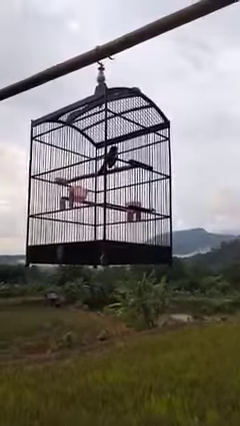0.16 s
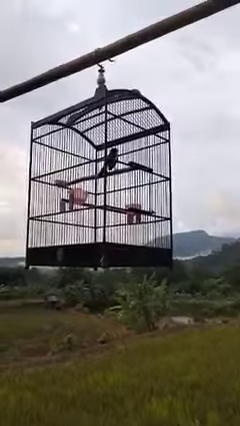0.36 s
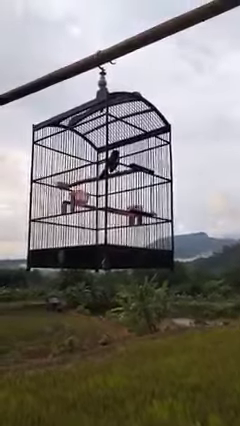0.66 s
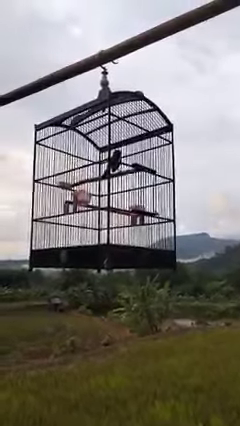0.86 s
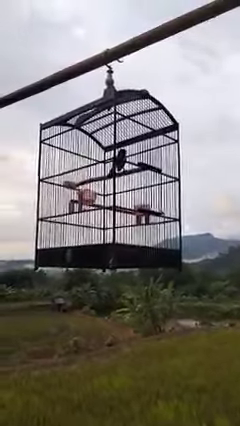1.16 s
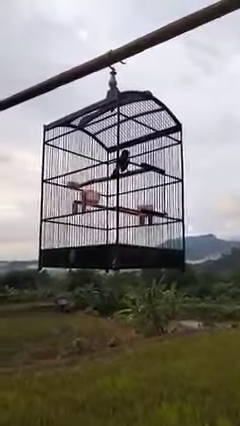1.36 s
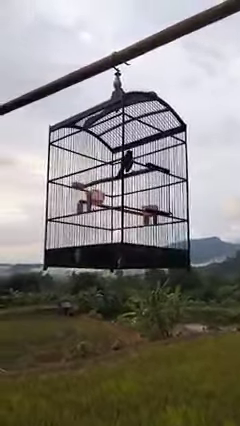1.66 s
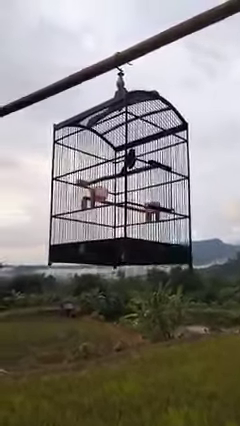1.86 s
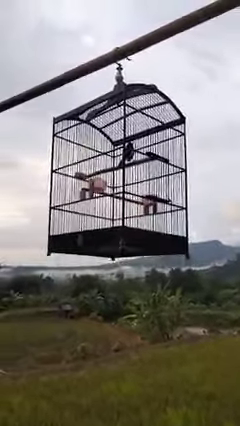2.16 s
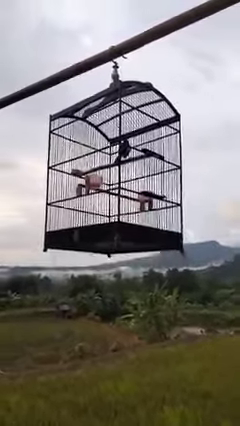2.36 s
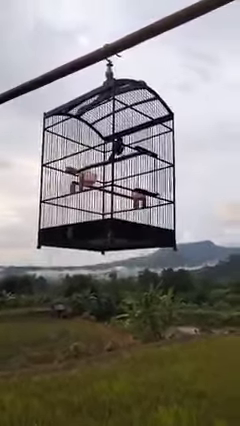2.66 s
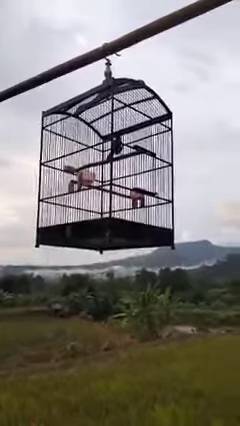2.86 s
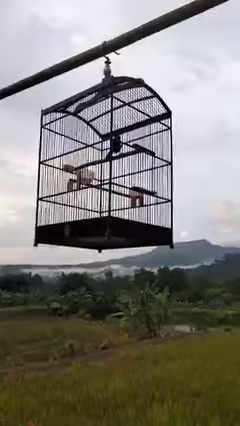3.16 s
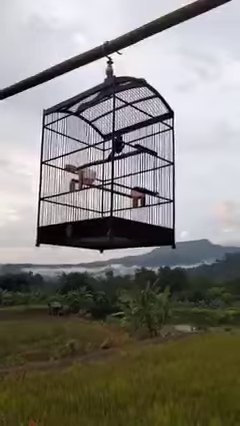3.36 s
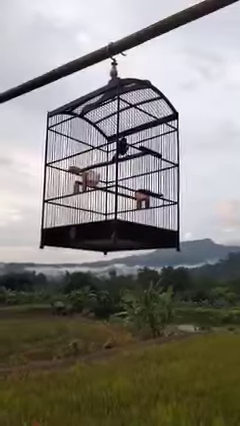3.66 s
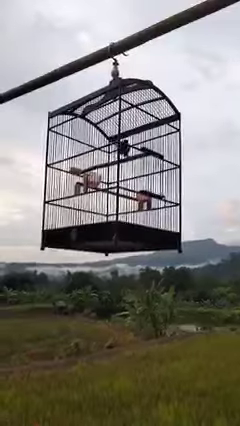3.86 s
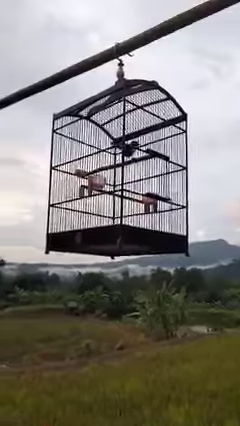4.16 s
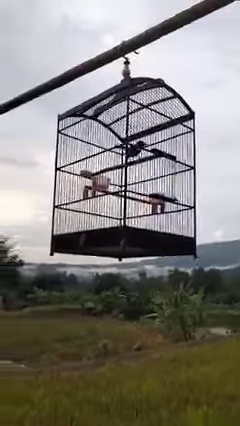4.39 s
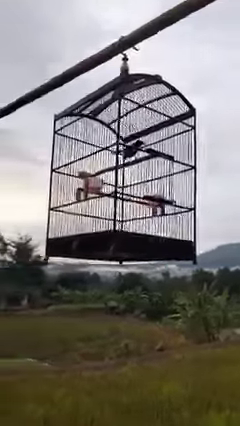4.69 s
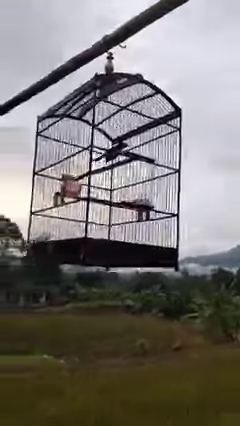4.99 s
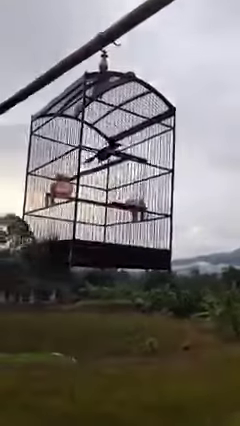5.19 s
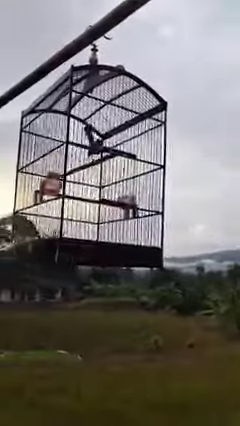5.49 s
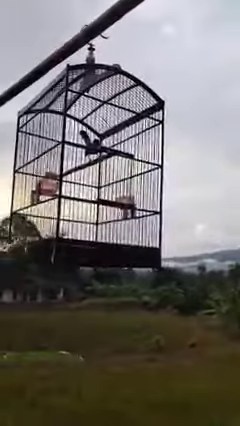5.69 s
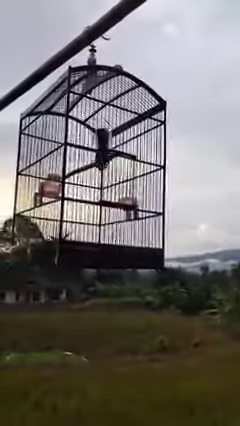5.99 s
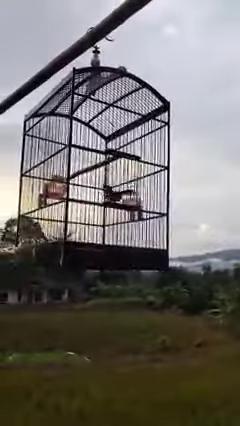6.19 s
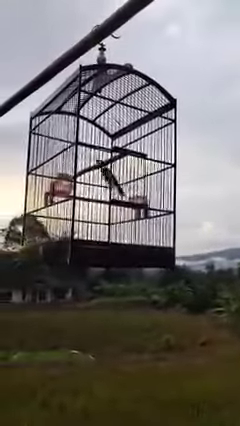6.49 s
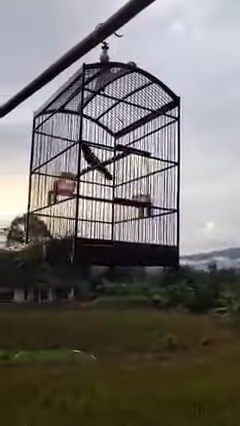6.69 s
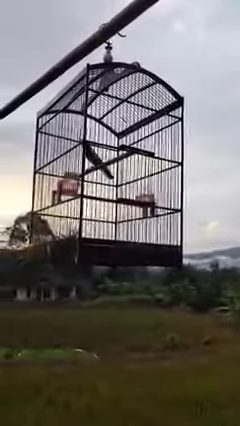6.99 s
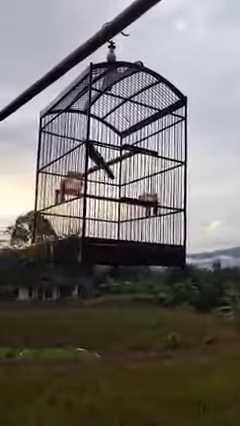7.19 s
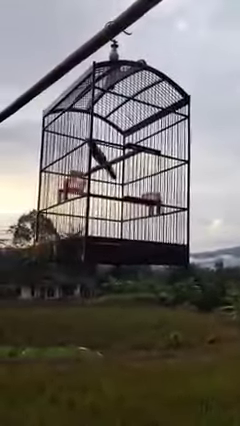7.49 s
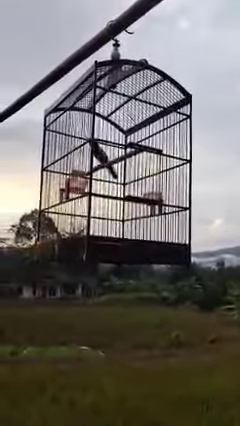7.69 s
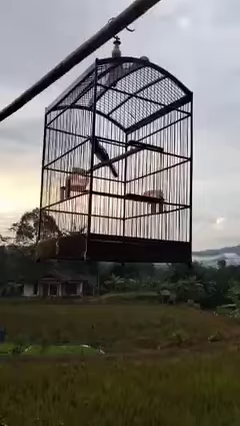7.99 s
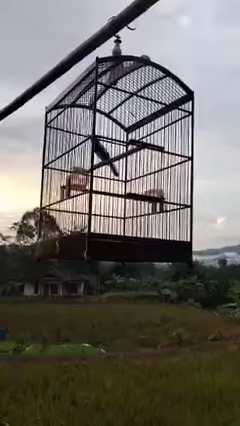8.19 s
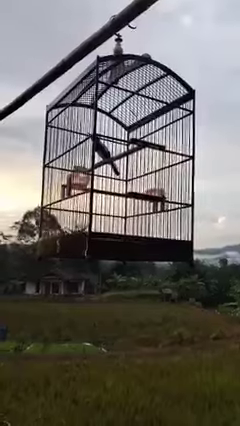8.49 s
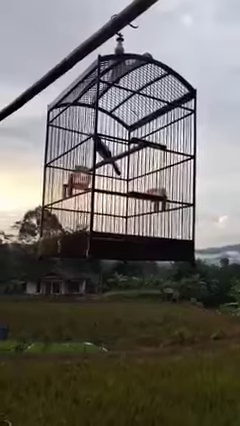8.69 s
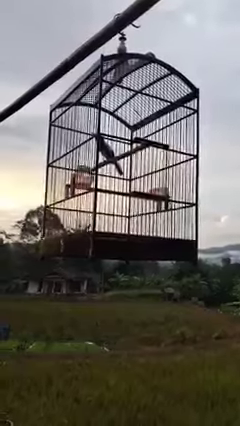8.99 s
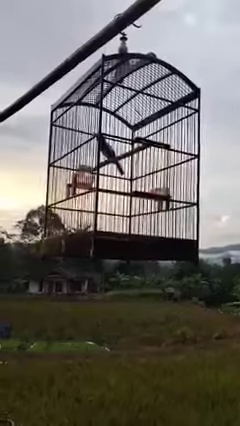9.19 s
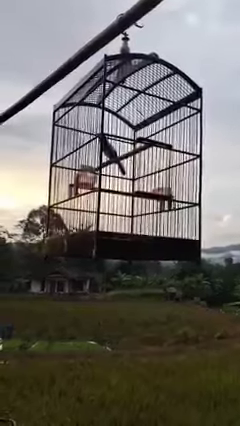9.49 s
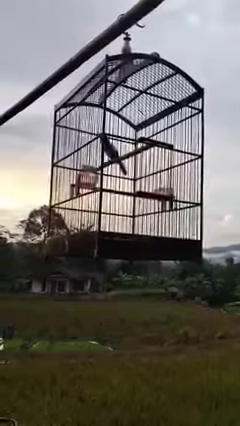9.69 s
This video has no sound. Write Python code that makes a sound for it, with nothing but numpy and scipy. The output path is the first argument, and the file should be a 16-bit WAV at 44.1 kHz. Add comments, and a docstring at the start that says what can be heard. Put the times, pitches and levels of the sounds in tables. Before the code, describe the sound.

Loud, sharp whistled phrases from a nearby caged bird echo lightly over open fields, broken by pauses with faint distant birdsong.

```python
"""Caged magpie-robin above rice fields

A magpie-robin sings three phrases from a hanging cage: gliding sines for the two sides of its syrinx,
pulsed harmonics for buzzes, noise bursts for rasps, and a wall nearby throws the song back.
Feet tap the perches as decaying sines; one dry tick and its rustle are shaped noise.
Birds further off are blurred sine whistles, over humming distant engines and filtered-noise air."""
import sys
import numpy as np
from scipy import signal
from scipy.fft import rfft, irfft
from scipy.io import wavfile
from scipy.ndimage import map_coordinates

SR = 44100
rng = np.random.default_rng(int(sys.argv[2]) if len(sys.argv) > 2 else 0)


def log_audio(samples):
    """Write samples as a 16-bit WAV file to the path given in sys.argv[1]."""
    # one column per channel
    frames = np.atleast_2d(samples).T
    # limit to full scale, then quantise
    limited = np.clip(frames, -1, 1)
    pcm = np.round(limited * 32767).astype(np.int16)
    wavfile.write(sys.argv[1], SR, pcm)


N = 434385
TIME = np.arange(N) / SR

# Low wash of the valley: relative spectrum (frequency [Hz], level [dB])
AIR_SPECTRUM = [(15, -55.5), (25, -21.5), (96, -15), (123, -6), (210, -1.5), (306, -8), (366, -6),
                (400, -10), (533, -12.5), (819, -13), (1800, -16.5), (2340, -70.5), (3960, -120)]
# Its slow level before a small overall trim: (time [s], level [dB])
AIR_LEVEL = [(0.0, -51.5), (2.47, -50.5), (6.01, -55), (7.41, -53), (9.85, -54.5)]
# High outdoor hiss: relative spectrum (frequency [Hz], level [dB])
HISS_SPECTRUM = [(1000, -26), (1700, -7), (2500, 1), (3600, -2), (4600, -10.5), (5500, -5.5), (6500, -11),
                 (7500, -0.5), (8200, -6.5), (9100, -10.5), (9800, -23), (11800, -19.5), (15000, -33)]
# Its level, around which it gently swells: (time [s], level [dB])
HISS_LEVEL = [(0, -59), (8.4, -57.5), (9.2, -57), (9.85, -56.5)]

# Two distant engines: strength of each multiple of the firing rate (multiple, relative level [dB])
# and the level of the whole engine (time [s], level [dB])
FIRST_ENGINE_HZ, SECOND_ENGINE_HZ = 40.9, 44.5
FIRST_ENGINE_ORDERS = [(1, -22), (2, -13), (3, -11), (4, -13), (5, 0.5), (6, -12), (7, -14), (8, -13.5),
                       (10, -16)]
FIRST_ENGINE_LEVEL = [(0, -60.5), (.7, -51.5), (1.05, -60.5), (1.55, -54), (1.9, -61), (2.6, -54),
                      (3.9, -57), (4.6, -62), (6.2, -70), (7.5, -61), (8.2, -69), (9.85, -68)]
SECOND_ENGINE_ORDERS = [(2, -14.5), (3, -2.5), (4, -2), (5, -0.5), (6, -8), (7, -8), (9, -2)]
SECOND_ENGINE_LEVEL = [(0, -60.5), (3, -59.5), (5, -59.5), (6.5, -62), (9.85, -63)]
# Thin engine whine: (time [s], level [dB])
WHINE_HZ = 451
WHINE_LEVEL = [(0, -58), (.2, -65), (.48, -67), (.54, -58), (.95, -55.5), (1.03, -68.5), (2.3, -63.5),
               (3.2, -86.5), (9.85, -86)]

# Three notes of a tumbling call, each holding and then dropping:
# (delay [s], length [s], drop [share of pitch], accent [dB])
TUMBLE_NOTES = [(0, .055, -0.108, -3.5), (.06, .055, -0.092, -2.5), (.115, .06, -.22, .5)]
# Tumbling calls: (time [s], time stretch, first, second, third pitch [Hz], level before accents and distance [dB])
TUMBLE_CALLS = [(.228, 0.89, 3410, 3000, 2410, -35.5), (3.558, 0.89, 3387, 2770, 2580, -40),
                (3.87, 1.0, 3600, 3000, 2567, -38.5), (6.442, 0.94, 3510, 3020, 2630, -40.5),
                (8.068, 0.73, 3370, 2880, 2380, -44)]
# Three notes of a middle-high-low song, gliding evenly:
# (delay [s], length [s], glide [share of pitch], accent [dB])
SEESAW_NOTES = [(0, 0.07, 0.021, 2.5), (.044, 0.11, 0.0028, 4), (.225, 0.118, 0.031, -5)]
# Middle-high-low songs: (time [s], time stretch, first, second, third pitch [Hz],
# level before accents and distance [dB])
SEESAW_CALLS = [(4.595, 0.99, 2485, 3420, 2114, -39.5), (4.998, 1.12, 2600, 3460, 1987, -43.5),
                (8.66, 0.97, 2606, 3502, 2083, -47.5), (9.062, 1, 2536, 3397, 1987, -45)]
# Single far whistles: (time [s], length [s], mid pitch [Hz], glide [share of pitch], level before distance [dB])
FAR_WHISTLES = [ (.008, 0.052, 6080, 0.15, -43), (.015, 0.024, 5620, 0.051, -49),
                (0.494, 0.022, 2830, -.018, -40), (.626, 0.13, 3814, -0.058, -36.5),
                (.72, 0.084, 2000, 0.11, -40.5), (0.878, .076, 4160, 0.043, -38),
                (0.905, 0.14, 3394, 0.0054, -37), (1.152, 0.047, 2115, 0.027, -43),
                (1.283, 0.071, 2570, -0.049, -40), (1.337, 0.062, 4840, 0.11, -43.5),
                (1.342, 0.031, 3530, 0.035, -31), (1.45, 0.032, 2016, -0.042, -41),
                (1.468, .04, 3170, -0.066, -41), (2.774, 0.024, 5770, -0.073, -44),
                (3.083, 0.046, 3166, -0.2, -42), (3.2, .04, 4390, -0.1, -44),
                (3.24, .035, 4670, 0.0043, -53), (3.599, 0.041, 2737, 0.014, -34),
                (3.744, 0.06, 2698, -0.016, -35), (3.997, 0.057, 2535, -.03, -36.5),
                (4.348, .07, 2360, -.05, -50), (4.407, 0.075, 2003, 0.011, -41), (4.956, .04, 2430, 0, -52),
                (5.228, 0.046, 1850, .03, -53), (4.679, 0.24, 2630, -0.045, -39.5),
                (5.328, 0.036, 4230, 0.18, -44), (5.344, 0.038, 3810, 0.1, -46),
                (5.355, 0.026, 4960, 0.06, -43), (5.393, 0.041, 5360, .1, -41),
                (5.51, 0.038, 3850, .09, -49), (5.513, .045, 4250, 0.055, -45),
                (5.54, .045, 4900, .1, -46.5), (5.584, 0.06, 5520, 0.0035, -36),
                (5.781, 0.062, 3094, -0.075, -42.5), (5.822, 0.025, 3780, 0.12, -40.5),
                (5.934, 0.075, 3290, -0.099, -41.5), (6.052, 0.086, 3494, 0.1, -47),
                (6.244, 0.11, 3130, -0.038, -36.5), (6.448, 0.056, 5470, 0.26, -46),
                (6.436, 0.067, 3540, -0.18, -41), (6.47, .1, 2850, -0.24, -42),
                (6.758, 0.15, 3040, -0.12, -44.5), (7.78, 0.048, 2490, -0.029, -45.5),
                (8.205, 0.029, 4140, -0.036, -50), (8.23, .035, 3800, -0.039, -49.5),
                (8.329, 0.03, 4000, -0.0048, -45.5), (8.362, 0.027, 3770, -.02, -48.5),
                (8.345, 0.037, 6940, -.09, -52), (8.115, 0.11, 2900, 0, -46),
                (8.436, 0.13, 1946, 0.083, -48), (8.463, 0.042, 3960, -0.03, -52),
                (8.894, 0.064, 2080, 0.024, -43.5), (9.305, 0.049, 6250, -0.1, -53)]

# Feet tapping perches and bars as the robin shifts and hops: (time [s], ring [Hz], peak level [dB])
HOP_TAPS = [(4.591, 1330, -51), (4.792, 980, -50), (4.898, 1220, -48), (5.446, 1060, -45),
            (5.753, 1590, -48), (6.104, 1105, -44.5), (6.289, 1580, -45), (6.352, 1100, -49),
            (6.454, 1670, -47.5), (6.743, 1590, -45.5)]
# Small dry tick close by, with a brief rustle after it: (time [s], level [dB])
TICKS = [(9.777, -46.5)]
# Its relative spectrum: (frequency [Hz], level [dB])
TICK_SPECTRUM = [(800, -13), (3000, 1), (5500, 3.5), (15000, -15)]

# Buzzes, where the membranes slap shut ever faster:
# (time [s], length [s], first, last pulse rate [Hz], first, last level [dB])
BUZZES = [(1.532, .036, 852, 874, -35.5, -43), (1.577, 0.036, 886, 1277, -35.5, -32),
          (1.849, 0.037, 1103, 1450, -50.5, -19), (6.846, .08, 910, 1097, -40, -32.5),
          (7.156, 0.037, 954, 1336, -42, -23)]
# Throat resonance on buzzes and rasps: (frequency [Hz], relative level [dB])
THROAT = [(900, -27.5), (1800, -7.5), (2700, 0.5), (3600, 6), (4500, 2.5), (5500, -10), (6500, -8.5),
          (7300, -8.5), (9000, -39), (15000, -19)]
# Breathy rasps at sharp note onsets: (time [s], length [s], level [dB])
RASPS = [(1.364, 0.036, -39), (1.589, .025, -53), (2.133, 0.03, -50), (6.369, 0.021, -43),
         (6.713, 0.015, -41), (6.897, 0.025, -39), (7.187, 0.061, -48), (7.439, 0.1, -45.5)]
# Slurred whistles, each one bend of pitch and loudness: (time [s], length [s], start, middle, end pitch [Hz],
# start, middle, end level before the beak [dB], octave relative to the fundamental [dB])
SLURS = [ (0.795, 0.045, 3680, 3217, 3380, -35.5, -20.5, -25.5, -25.5),
         (0.912, 0.069, 1665, 2244, 2035, -26, -27.5, -20, -38),
         (0.989, 0.033, 2180, 2275, 2220, -30, -33, -36.5, -31),
         (1.373, 0.03, 2680, 2557, 1600, -7.5, -21, -24.5, -25),
         (1.545, 0.019, 2540, 2590, 2620, -31.5, -30.5, -30, -30),
         (1.575, .022, 2610, 2680, 2950, -31.5, -26, -31, -25),
         (1.593, 0.041, 2190, 2432, 2224, -32.5, -21.5, -19, -27.5),
         (1.595, 0.039, 6600, 7080, 7180, -47, -45, -39, -32),
         (1.622, 0.068, 7100, 7090, 7030, -44, -44, -37.5, -28),
         (1.737, 0.13, 2350, 2416, 2270, -16, -22, -20, -31),
         (1.859, 0.028, 3300, 3470, 3920, -32, -17.5, -16, -15),
         (2.619, 0.035, 3250, 3133, 3154, -29, -14.5, -16, -36.5),
         (2.739, 0.07, 1684, 2082, 1960, -28.5, -27, -27.5, -27),
         (6.371, 0.037, 2575, 2330, 1900, -28, -31, -39, -11),
         (6.717, 0.033, 2470, 2433, 1830, -17.5, -32, -31, -4.5),
         (6.71, 0.14, 5470, 5350, 5450, -45, -44, -54, -43),
         (6.851, 0.037, 3665, 3720, 3700, -33.5, -29, -34, -29),
         (6.856, 0.067, 5400, 5320, 6160, -49.5, -38.5, -38.5, -26),
         (6.902, 0.03, 1918, 2132, 2470, -31.5, -32.5, -39.5, 12),
         (6.924, 0.036, 2250, 2353, 2170, -37, -23.5, -37, -9),
         (7.052, 0.051, 2270, 2399, 2400, -23, -24.5, -31, -19),
         (7.108, 0.0774, 2339, 2400, 2293, -23.5, -23.5, -31, -21)]
# How well the beak radiates a slur: (frequency [Hz], gain [dB])
BEAK = [(1500, -1.5), (2000, -7), (2600, 1), (3900, -6.5), (4400, -2), (5500, 6), (8000, 0.5)]
# Loud arches in the opening figure, strongest on their flanks, one curve each:
# (time [s], pitch [Hz], level [dB], level of its octave [dB])
ARCHES = [
    [(.838, 1940, -38.5, -61), (.845, 2232, -34.5, -51), (.851, 2637, -16.5, -46), (.86, 3150, -16, -51),
     (.868, 3444, -27.5, -55), (.876, 3475, -22, -57), (.883, 3105, -15.5, -56), (.892, 2380, -20, -63.5),
     (.901, 1554, -46, -62.5), (.924, 1690, -38, -72)],
    [(2.66, 2142, -38, -55), (2.667, 2536, -20.5, -52), (2.672, 2764, -21.5, -45), (2.68, 3090, -10.5, -56),
     (2.689, 3343, -28, -60), (2.696, 3400, -32, -62), (2.703, 3180, -15, -57), (2.715, 2597, -17.5, -58),
     (2.724, 2090, -33, -62), (2.738, 1680, -39, -63)],
]
# Upsweeps that close the opening figure:
# (time [s], length [s], low, top pitch [Hz], level at the foot, in mid-climb, at the top [dB])
UPSWEEPS = [(1.018, 0.073, 2782, 4016, -21.5, -13.5, -15), (2.842, 0.081, 2584, 5150, -24.5, -16.5, -36)]
# Lower side of the syrinx, one curve per twitter, before mixing and the beak:
# (time [s], pitch [Hz], level [dB], level of its octave [dB])
LOWER_SIDE = [
    [(1.884, 2370, -32, -35), (1.89, 2740, -15.5, -30), (1.894, 3220, -22.5, -32), (1.899, 3840, -13, -45),
     (1.903, 3840, -8, -66), (1.906, 3750, -16.5, -53), (1.91, 3360, -20.5, -47), (1.917, 3030, -41, -48)],
    [(2.019, 2960, -33, -50.5), (2.026, 3530, -23, -47), (2.035, 3670, -18.5, -40), (2.048, 3850, -32, -50),
     (2.058, 3965, -22, -59), (2.063, 3790, -33.5, -38), (2.069, 3260, -39, -46)],
    [(2.111, 2335, -48, -38), (2.116, 2620, -22.5, -22), (2.122, 2970, -45.5, -21),
     (2.127, 3640, -18.5, -35), (2.132, 3900, -19.5, -45), (2.139, 3400, -36, -26.5),
     (2.147, 3825, -31, -42), (2.16, 3540, -28.5, -37), (2.167, 2920, -48, -49)],
    [(2.208, 2516, -30, -34), (2.214, 2990, -40, -25), (2.218, 3115, -29.5, -31), (2.222, 3630, -24, -35),
     (2.226, 3860, -22, -38), (2.23, 3416, -32, -29.5), (2.245, 3580, -30, -25.5),
     (2.272, 3390, -35.5, -31), (2.282, 3140, -42, -36), (2.291, 2600, -27, -21)],
    [(7.184, 2343, -44, -34.5), (7.192, 2620, -23, -23), (7.198, 3364, -27, -23.5),
     (7.204, 4027, -15, -54.5), (7.211, 4280, -13.5, -60), (7.218, 3630, -12, -33.5),
     (7.224, 4450, -18.5, -58), (7.229, 3810, -9, -43.5), (7.234, 3680, -17.5, -48),
     (7.242, 3940, -13.5, -68.5)],
    [(7.337, 2690, -25, -40.5), (7.344, 3130, -37.5, -31), (7.351, 3440, -30, -32),
     (7.358, 3910, -24, -46.5), (7.366, 3935, -23.5, -41), (7.379, 4220, -22, -40), (7.384, 3670, -33, -49),
     (7.391, 3000, -47, -39)],
    [(7.437, 2360, -30, -34), (7.444, 3230, -31, -25), (7.45, 3846, -24, -40), (7.457, 3620, -30.5, -31),
     (7.474, 3776, -25, -37.5), (7.486, 4185, -27, -39), (7.492, 3880, -27, -52), (7.498, 3230, -34, -25.5),
     (7.505, 2530, -41, -45)],
    [(7.542, 2570, -51, -31), (7.549, 3405, -32, -33), (7.556, 4050, -32.5, -47), (7.565, 3140, -30, -23),
     (7.572, 3570, -40, -32), (7.585, 3820, -29, -41), (7.594, 3990, -34, -43), (7.606, 3185, -38, -25),
     (7.618, 3490, -43, -43), (7.632, 3550, -40, -32), (7.642, 3110, -42, -28.5), (7.655, 2872, -39, -27),
     (7.674, 2854, -39.5, -19.5), (7.684, 2570, -39, -23), (7.696, 1790, -61, -44)],
]
# Upper side, likewise: (time [s], pitch [Hz], level [dB])
UPPER_SIDE = [
    [(1.866, 4670, -44), (1.88, 4800, -41.5), (1.896, 5350, -28), (1.902, 5830, -27), (1.908, 5250, -27.5),
     (1.914, 4680, -31), (1.926, 4340, -34)],
    [(2.017, 3520, -36), (2.022, 4410, -36), (2.028, 5070, -34), (2.035, 5570, -29), (2.044, 5650, -24),
     (2.05, 5430, -28.5), (2.057, 5750, -23.5), (2.062, 5320, -28), (2.068, 3900, -36)],
    [(2.121, 2910, -29), (2.126, 4550, -29), (2.13, 5660, -22), (2.134, 5630, -17.5), (2.138, 4680, -23),
     (2.144, 4880, -22.5), (2.152, 5410, -23.5), (2.156, 4800, -29), (2.166, 4500, -32)],
    [(2.213, 2880, -33), (2.218, 4390, -36.5), (2.222, 5350, -24), (2.226, 5960, -17.5), (2.231, 5390, -21),
     (2.248, 5510, -26.5), (2.26, 5110, -34.5), (2.285, 5520, -29), (2.293, 5320, -29), (2.306, 5340, -33)],
    [(7.192, 3500, -31.5), (7.198, 4440, -22), (7.203, 5600, -27.5), (7.207, 5620, -16.5),
     (7.211, 5330, -18), (7.217, 4060, -40)],
    [(7.347, 3140, -24.5), (7.353, 4430, -23), (7.357, 5560, -22), (7.36, 5930, -17.5), (7.365, 5470, -20),
     (7.371, 5400, -23), (7.378, 5840, -16.5), (7.382, 5780, -14.5), (7.389, 4100, -31)],
    [(7.443, 3120, -36.5), (7.448, 4730, -24), (7.452, 5450, -17), (7.458, 4640, -27), (7.467, 5210, -19),
     (7.474, 4600, -34), (7.486, 5180, -21), (7.493, 4570, -33), (7.5, 3100, -36)],
    [(7.546, 2990, -40), (7.551, 4500, -34), (7.556, 5560, -17.5), (7.56, 5230, -27), (7.565, 4850, -35),
     (7.588, 5130, -26), (7.61, 5260, -40), (7.625, 6050, -41), (7.645, 5940, -29)],
]
# How the wide-open beak radiates a twitter: (frequency [Hz], gain [dB])
GAPE = [(1200, -18.5), (2000, -4), (4000, 2), (5500, 1), (7500, 1.5), (8200, 3.5), (9500, -1.5),
        (12500, 1.5), (15000, -2.5)]
# Airstream hiss in a twitter: (frequency [Hz], gain [dB])
AIRSTREAM_SPECTRUM = [(1500, -21), (2800, -4.5), (7000, -0.5), (12500, 7), (15000, -3)]
# On its new perch the bird faces another way and its overtones carry better
PERCH_CHANGE_S, FACING_DB = 6.5, 21.5
ATTACK_S, RELEASE_S = 0.0097, 0.0064  # of slurs and upsweeps

# Reflections from the cage, the eaves and the nearest wall: (delay [s], gain [dB])
CLOSE_ECHOES = [(.0027, -25.5), (.0062, -9.5), (0.0134, -12), (.05, -22)]
# Smeared, rough echoes off walls: (delay [s], gain [dB])
WALL_ECHOES = [(.045, -17.5), (.092, -25)]
# What walls and foliage send back: (frequency [Hz], gain [dB])
ECHO_COLOUR = [(1500, 9.5), (2400, 6.5), (3200, 2.5), (3900, 4.5), (5600, -5), (7500, 4), (12000, 4.5)]
# Overall tone colour, whose treble steps down above 8 kHz: (frequency [Hz], gain [dB])
TONE_COLOUR = [(20, -2.5), (8000, 1.5), (8500, -13), (9500, -14), (12000, -12), (14800, -7), (15700, -23.5)]


def gain_of(db):
    """Decibels to amplitude."""
    return 10 ** (np.asarray(db) / 20)


def evened(x):
    """Scales to rms 1."""
    return x / np.sqrt(np.mean(x ** 2) + 1e-20)


def read(points, hz):
    """Reads a spectrum's dB at given frequencies, along a log frequency axis."""
    f, db = np.transpose(points)
    return np.interp(np.log(hz + 1), np.log(f + 1), db)


def level(curve):
    """A dB curve as a gain at every sample."""
    return gain_of(np.interp(TIME, *np.transpose(curve)))


def coloured(x, points):
    """Filters x by a spectrum."""
    gains = gain_of(read(points, np.fft.rfftfreq(len(x), 1 / SR)))
    return irfft(rfft(x) * gains, len(x))


def wander(size, hz):
    """Smooth random drift of rms about 1, with fluctuations up to about hz."""
    knots = rng.standard_normal(int(size * 2 * hz / SR) + 4)
    return map_coordinates(knots, [np.arange(size) * 2 * hz / SR], order=2, mode="nearest")


def add(mix, s, sound):
    """Mixes a sound in at time s."""
    part = mix[max(round(s * SR), 0):][:len(sound)]
    part += sound[:len(part)]


def gate(size, attack_s, release_s):
    """Smooth attack, hold, smooth release."""
    t = np.arange(size) / SR
    return np.sin(np.pi / 2 * np.clip(np.minimum(t / attack_s, t[::-1] / release_s), 0, 1)) ** 2


def bend(u, start, middle, end):
    """The parabola through three values, for u from 0 to 1."""
    return start * (1 - u) * (1 - 2 * u) + 4 * middle * u * (1 - u) + end * u * (2 * u - 1)


def scatter(x, t60, rise_s):
    """Diffuse echoes from foliage and walls: sparse random taps that swell and die."""
    t = np.arange(SR) / SR
    taps = rng.choice([-1., 1.], SR) * (rng.random(SR) < 2000 / SR)  # about 2000 a second
    tail = taps * gain_of(-60 * t / t60) * (1 - np.exp(-t / rise_s))
    return signal.fftconvolve(x, tail / np.linalg.norm(tail))[:N]


def open_air(rumble_db=-0.7, swell_db=0.6):
    """The low wash of the valley and a gently swelling high hiss, both filtered noise."""
    rumble = evened(coloured(rng.standard_normal(N), AIR_SPECTRUM))
    rumble = rumble * level(AIR_LEVEL) * gain_of(rumble_db)
    hiss = evened(coloured(rng.standard_normal(N), HISS_SPECTRUM))
    hiss = hiss * level(HISS_LEVEL) * gain_of(swell_db * wander(N, 4))
    return rumble + hiss


def engine(firing_hz, orders, drift=.0025, fade_db=2.5, fade_hz=2):
    """Multiples of a slowly drifting firing rate, each fading on its own across the fields."""
    phase = 2 * np.pi * np.cumsum(firing_hz * (1 + drift * wander(N, 1.2))) / SR
    hum = np.zeros(N)
    for k, db in orders:
        fading = gain_of(db + fade_db * wander(N, fade_hz))
        hum += fading * np.sin(k * phase + 2 * np.pi * rng.random())
    return evened(hum)


def engines(whine_width_hz=3):
    """Two far engines on their own levels, and a thin whine of slightly unsteady pitch."""
    whine_hz = WHINE_HZ + whine_width_hz * wander(N, 11.0)
    whine = evened(np.sin(2 * np.pi * np.cumsum(whine_hz) / SR))
    first = level(FIRST_ENGINE_LEVEL) * engine(FIRST_ENGINE_HZ, FIRST_ENGINE_ORDERS)
    second = level(SECOND_ENGINE_LEVEL) * engine(SECOND_ENGINE_HZ, SECOND_ENGINE_ORDERS)
    return first + second + level(WHINE_LEVEL) * whine


def far_note(s, hz, db, shimmer_db=2.0):
    """A pure shimmering whistle that starts fading in 6 ms ahead of its time; returns start and sound."""
    loud = gain_of(db + shimmer_db * wander(len(hz), 63)) * signal.windows.tukey(len(hz), .5)
    return s - .006, loud * np.sin(2 * np.pi * np.cumsum(hz) / SR)


def call_notes(figure, calls):
    """Spells three-note calls out as (time [s], length [s], pitch [Hz], glide, level [dB])."""
    notes = []
    for s, stretch, *pitches, db in calls:
        for hz, (delay, length, glide, accent_db) in zip(pitches, figure):
            notes.append((s + stretch * delay, stretch * length, hz, glide, db + accent_db))
    return notes


def tumbles(direct_db=-12, echo_db=-1, waver=0.019):
    """The farthest singer: each note holds, then drops, and arrives mostly as echo."""
    out = np.zeros(N)
    for s, length, top_hz, drop, db in call_notes(TUMBLE_NOTES, TUMBLE_CALLS):
        u = np.linspace(0, 1, int(length * SR))
        hz = top_hz * (1 + drop * u ** 2 + waver * wander(len(u), 150))
        add(out, *far_note(s, hz, db))
    return gain_of(direct_db) * out + gain_of(echo_db) * scatter(out, t60=0.32, rise_s=0.0068)


def seesaw_notes(lead_s=.06, fall=.1, lead_db=-4):
    """The middle-high-low song; the bird slides softly down into each closing low note."""
    notes = call_notes(SEESAW_NOTES, SEESAW_CALLS)
    closing = notes[len(SEESAW_NOTES) - 1::len(SEESAW_NOTES)]
    slides = [(s - lead_s, lead_s, hz * (1 + fall / 2), -fall, db + lead_db) for s, _, hz, _, db in closing]
    return notes + slides


def birds_around(direct_db=-5, early_db=-6, late_db=-8, waver=0.0041, sweep_waver=.12):
    """Gliding whistles, blurred by the distance they travelled; the wider the sweep, the more it warbles."""
    out = np.zeros(N)
    for s, length, middle_hz, glide, db in FAR_WHISTLES + seesaw_notes():
        u = np.linspace(-.5, .5, int(length * SR))
        warble = (waver + sweep_waver * abs(glide)) * wander(len(u), 110)
        add(out, *far_note(s, middle_hz * (1 + glide * u + warble), db))
    early = gain_of(early_db) * scatter(out, t60=0.15, rise_s=0.0042)
    late = gain_of(late_db) * scatter(out, t60=0.3, rise_s=0.037)
    return gain_of(direct_db) * out + early + late


def ticks(t60=0.016, rustle_db=-13, rustle_t60=.5):
    """A tiny noise snap with no ring that trails off in a soft rustle."""
    out, t = np.zeros(N), np.arange(SR // 8) / SR
    fade = gain_of(-60 * t / t60) + gain_of(rustle_db - 60 * t / rustle_t60)
    for s, db in TICKS:
        noise = evened(coloured(rng.standard_normal(len(t)), TICK_SPECTRUM))
        add(out, s, gain_of(db) * fade * noise)
    return out


def hops(t60=0.073):
    """Soft taps that ring a wooden perch, each one decaying sine."""
    out, t = np.zeros(N), np.arange(SR // 8) / SR
    for s, hz, db in HOP_TAPS:
        add(out, s, gain_of(db - 60 * t / t60) * np.sin(2 * np.pi * hz * t))
    return out


def buzzes(jitter=0.027, uneven_db=4.5, attack_s=.008, release_s=0.0082):
    """Slow, uneven pulses of the syrinx: harmonics shaped by the throat, each swelling on its own."""
    out = np.zeros(N)
    k = np.arange(1, 15)[:, None]  # harmonic numbers
    for s, length, first_hz, last_hz, first_db, last_db in BUZZES:
        u = np.linspace(0, 1, int(length * SR))
        hz = (first_hz + (last_hz - first_hz) * u ** 3) * (1 + jitter * wander(len(u), 350))
        swell_db = uneven_db * np.array([wander(len(hz), 59.4) for _ in k])
        cycles = k * np.cumsum(hz) / SR + rng.random(k.shape)
        stack = gain_of(read(THROAT, k * hz) + swell_db) * np.cos(2 * np.pi * cycles)
        loud = gate(len(u), attack_s, release_s) * gain_of(first_db + (last_db - first_db) * u)
        add(out, s, loud * evened(stack.sum(0)))
    return out


def rasps():
    """Short chaotic noise bursts through the same throat."""
    out = np.zeros(N)
    for s, length, db in RASPS:
        burst = evened(coloured(rng.standard_normal(int(length * SR)), THROAT))
        add(out, s, gain_of(db) * burst * signal.windows.tukey(len(burst), .4))
    return out


def whistle(hz, db, octave_db, jitter, shimmer_db, flutter_hz=300, overtones_db=-30):
    """One side of the syrinx: a fluttering tone with an octave and further overtones above it."""
    phase = 2 * np.pi * np.cumsum(hz * (1 + jitter * wander(len(hz), flutter_hz))) / SR
    tone = np.sin(phase) + gain_of(octave_db) * np.sin(2 * phase)
    for k in range(3, 7):
        audible = k * hz < SR / 2  # no aliasing
        tone += gain_of(octave_db / 2 + overtones_db) * np.sin(k * phase) * audible
    return tone * gain_of(db + shimmer_db * wander(len(hz), flutter_hz))


def slurs():
    """Clear whistles whose pitch and loudness each follow a parabola, radiated by the beak."""
    out = np.zeros(N)
    for s, length, *shape, octave_db in SLURS:
        u = np.linspace(0, 1, int(length * SR))
        hz, db = bend(u, *shape[:3]), bend(u, *shape[3:])
        tone = whistle(hz, db + read(BEAK, hz), octave_db, jitter=0.0019, shimmer_db=1.0)
        add(out, s, gate(len(u), ATTACK_S, RELEASE_S) * tone)
    return out


def upsweeps(octave_db=-42, creep=.2, climb_from=.2, climb_to=0.88):
    """Whistles that linger on a low, creeping pitch, then climb in an S between two shares of the note."""
    out = np.zeros(N)
    for s, length, low_hz, top_hz, *levels_db in UPSWEEPS:
        u = np.linspace(0, 1, int(length * SR))
        climb = np.sin(np.pi / 2 * np.clip((u - climb_from) / (climb_to - climb_from), 0, 1)) ** 3
        hz = low_hz * (top_hz / low_hz) ** (climb + creep * (u - climb))
        db = np.interp(climb, [0, .35, 1], levels_db)
        tone = whistle(hz, db, octave_db, jitter=0.0026, shimmer_db=2.5)
        add(out, s, gate(len(u), ATTACK_S, RELEASE_S) * tone)
    return out


def syrinx_side(points, octave_db=-22, edge_s=0.0021, jitter=0.0084, shimmer_db=2.0, overtones_db=-40):
    """One side of the syrinx follows its curve of pitch and loudness, with a slight flutter."""
    s, hz, db, *octave = np.transpose(points)
    t = np.arange(s[0], s[-1], 1 / SR)
    loud_db = np.interp(t, s, db)
    if octave:  # from absolute level to level relative to the fundamental
        octave_db = np.interp(t, s, octave[0]) - loud_db
    overtones_db = overtones_db + FACING_DB * (s[0] > PERCH_CHANGE_S)
    tone = whistle(np.interp(t, s, hz), loud_db, octave_db, jitter, shimmer_db, overtones_db=overtones_db)
    return s[0], gate(len(t), edge_s, edge_s) * tone


def arches():
    """Whistles that swing up, over and steeply down."""
    out = np.zeros(N)
    for points in ARCHES:
        add(out, *syrinx_side(points, edge_s=0.0049, jitter=0.0032, shimmer_db=1.5, overtones_db=-34.5))
    return out


def twitters(coupling=0.27, airstream_db=-22):
    """The two sides share one airstream: each modulates the other, and it hisses when both sound."""
    low, high = np.zeros((2, N))
    for side, curves in (low, LOWER_SIDE), (high, UPPER_SIDE):
        for points in curves:
            add(side, *syrinx_side(points))
    both = np.sqrt(abs(low * high))
    airstream = gain_of(airstream_db) * both * coloured(rng.standard_normal(N), AIRSTREAM_SPECTRUM)
    modulation = 2 * coupling * low * high  # sum and difference tones
    return coloured(low + high + modulation + airstream, GAPE)


def robin(breath_db=-36, breath_hz=900, near_db=-13, field_db=-25):
    """All the notes of the song, whistles roughened by breath, with echoes near and far."""
    breath = 1 + gain_of(breath_db) * wander(N, breath_hz)
    song = (slurs() + arches() + upsweeps() + twitters()) * breath + buzzes() + rasps()
    thrown = coloured(song, ECHO_COLOUR)
    near = gain_of(near_db) * scatter(thrown, t60=0.14, rise_s=0.019)
    field = gain_of(field_db) * scatter(thrown, t60=0.64, rise_s=0.13)
    out = song + near + field
    for delay, db in CLOSE_ECHOES:
        add(out, delay, gain_of(db) * song)
    for delay, db in WALL_ECHOES:
        add(out, delay, gain_of(db) * scatter(thrown, t60=0.15, rise_s=.005))
    return out


def scene():
    """The countryside behind, the caged bird in front."""
    countryside = open_air() + engines() + tumbles() + birds_around()
    return (countryside + ticks() + hops() + robin())[None]


def record(dry, edge_hz=15700):
    """Darkens the scene above 8 kHz, then a steep low-pass."""
    dull = coloured(dry[0], TONE_COLOUR)
    low_pass = signal.firwin(1023, edge_hz, window=("kaiser", 9), fs=SR)
    return signal.oaconvolve(dull, low_pass, "same")[None]


dry = scene()
out = record(dry)
log_audio(out)
```